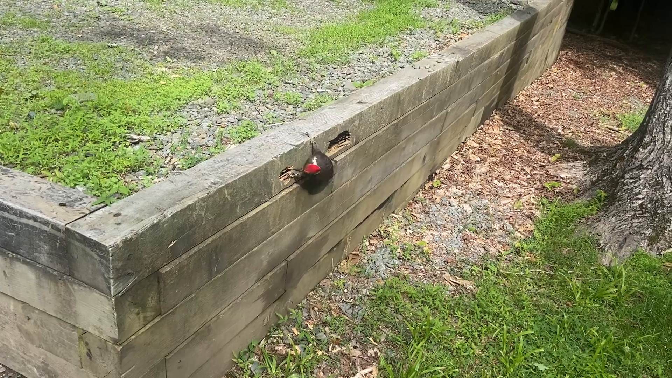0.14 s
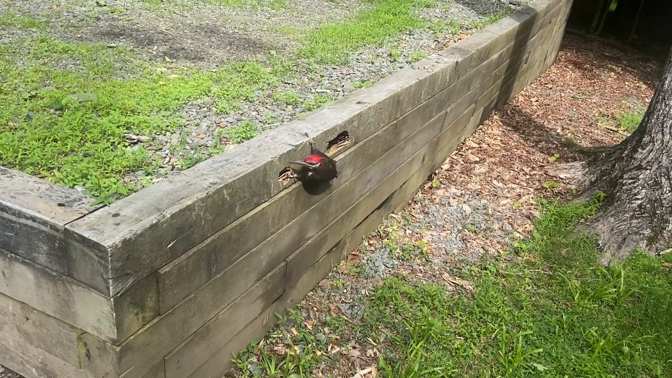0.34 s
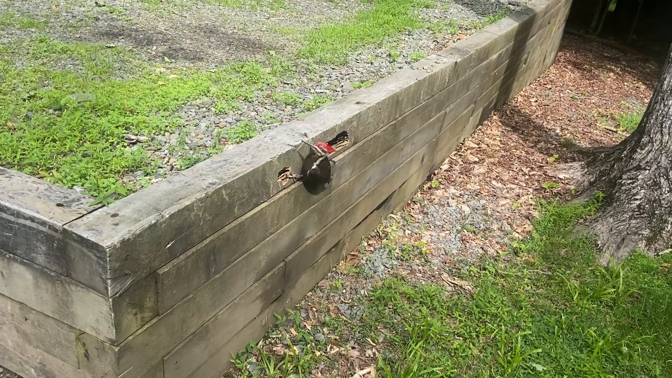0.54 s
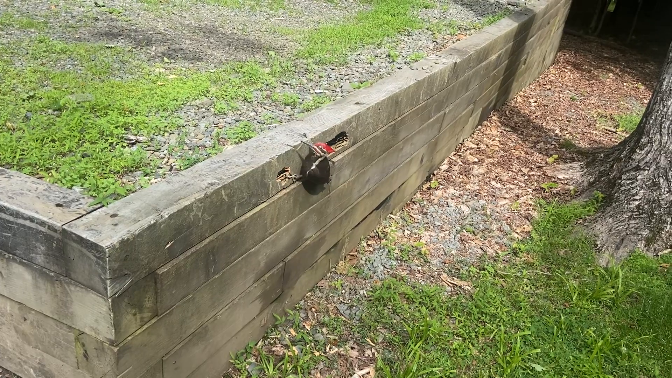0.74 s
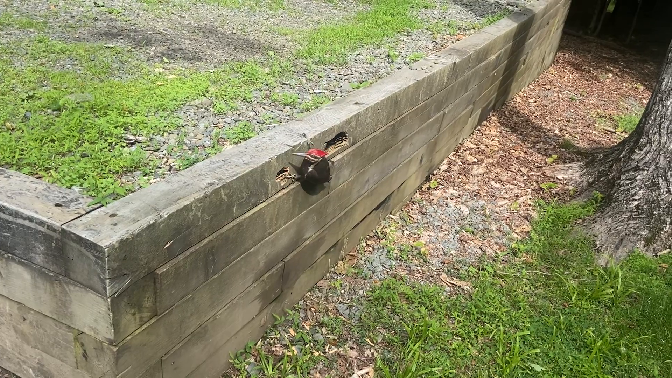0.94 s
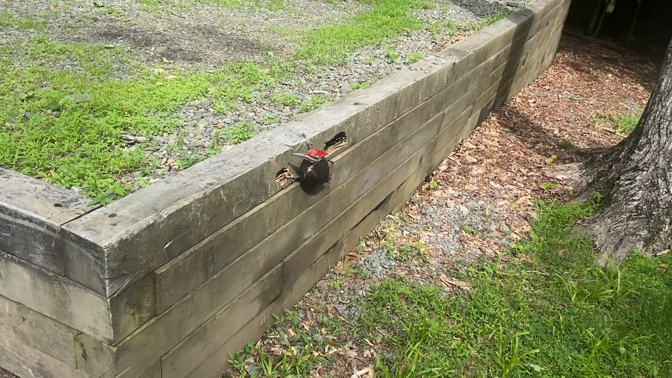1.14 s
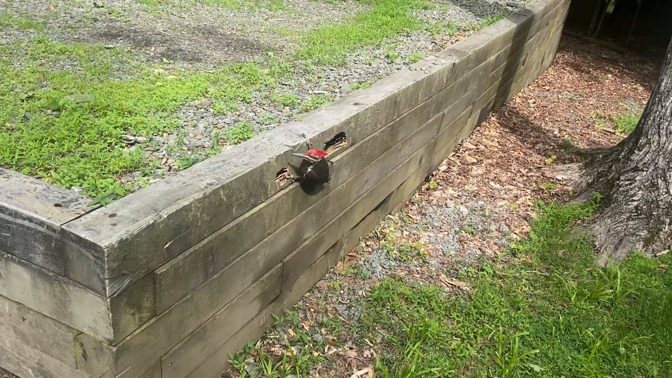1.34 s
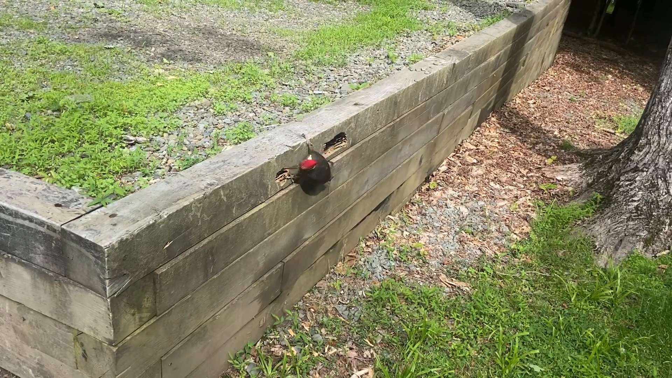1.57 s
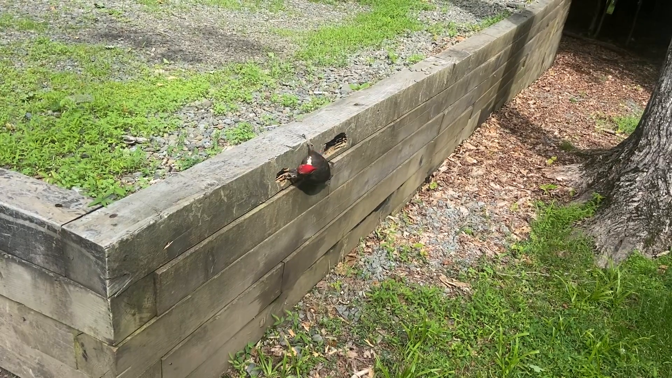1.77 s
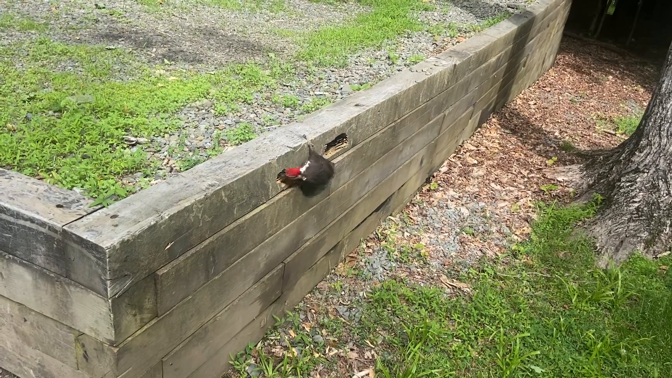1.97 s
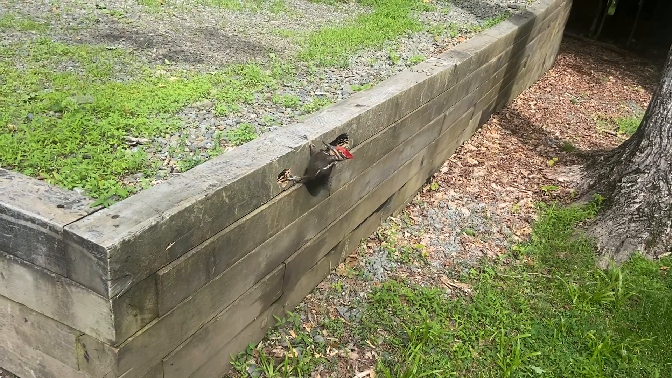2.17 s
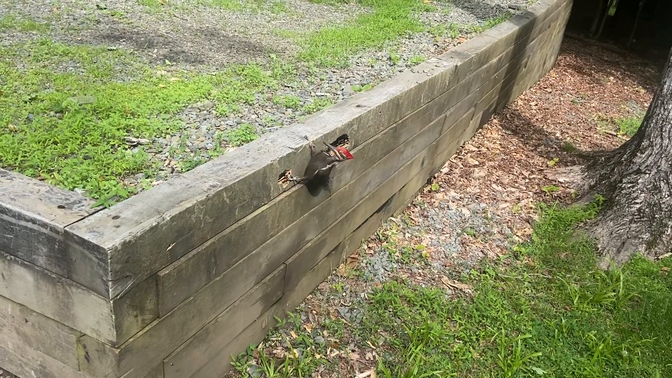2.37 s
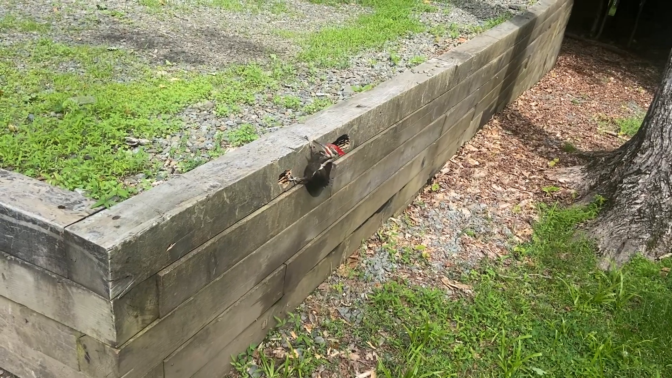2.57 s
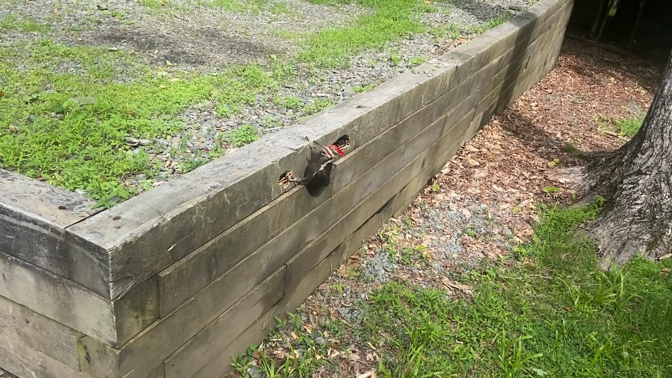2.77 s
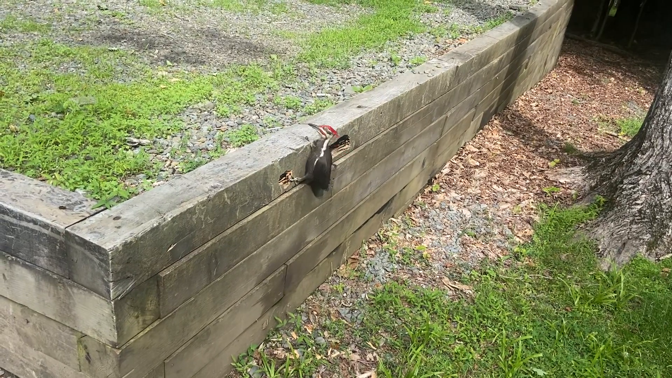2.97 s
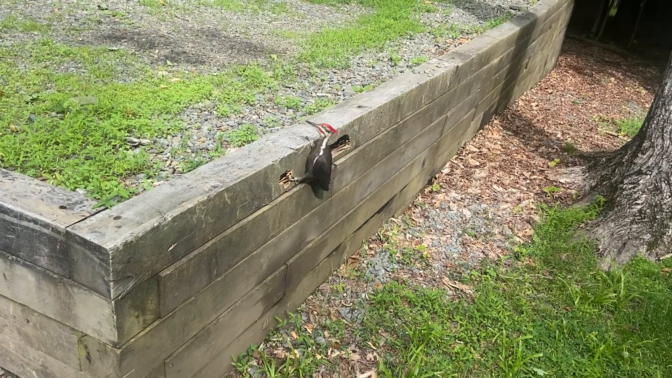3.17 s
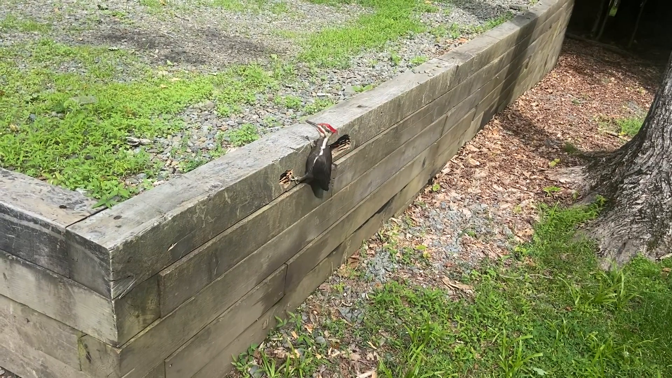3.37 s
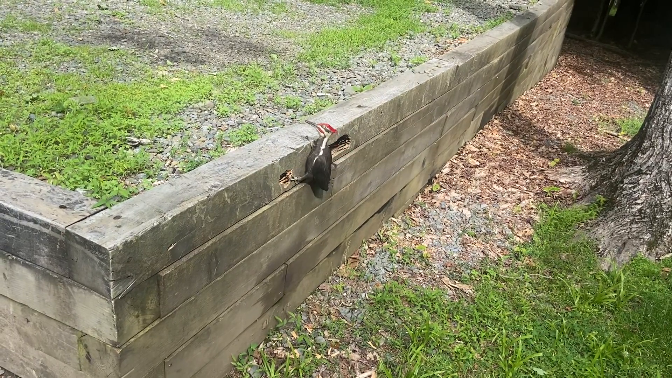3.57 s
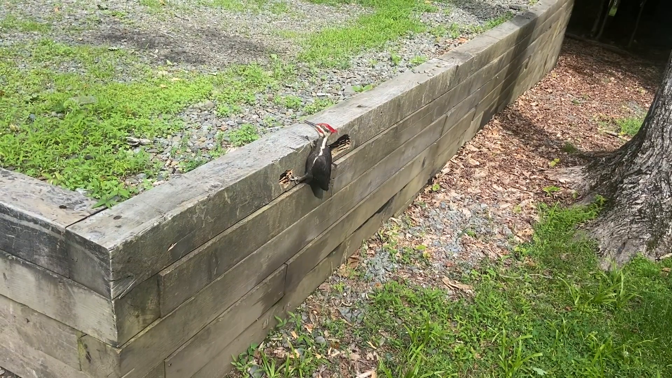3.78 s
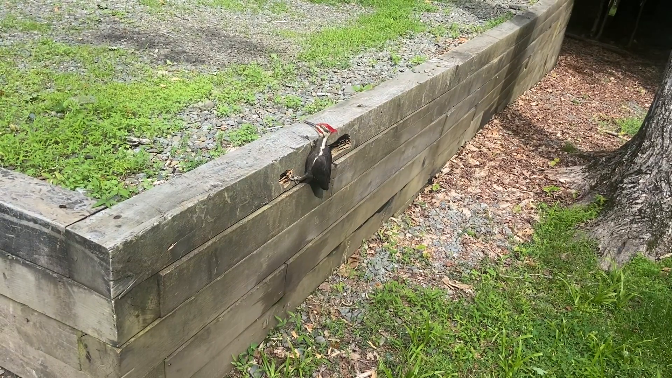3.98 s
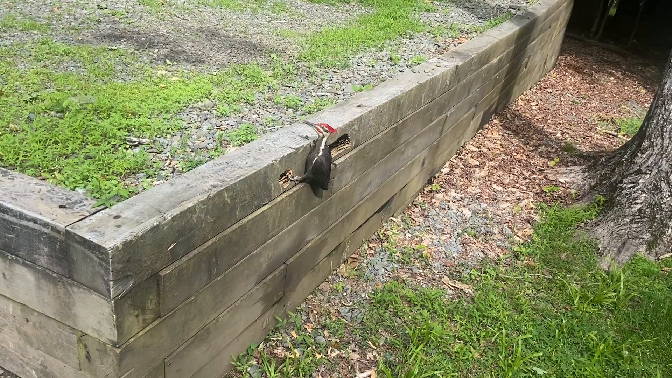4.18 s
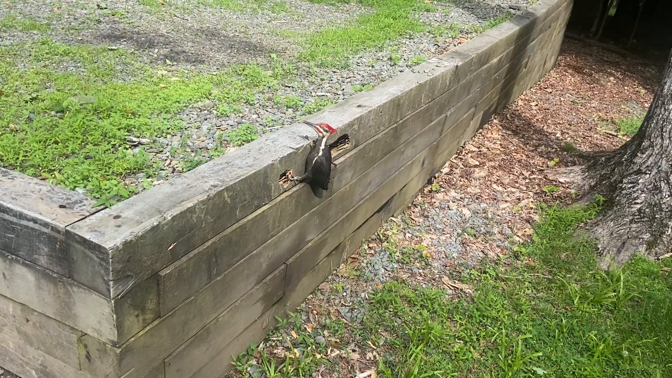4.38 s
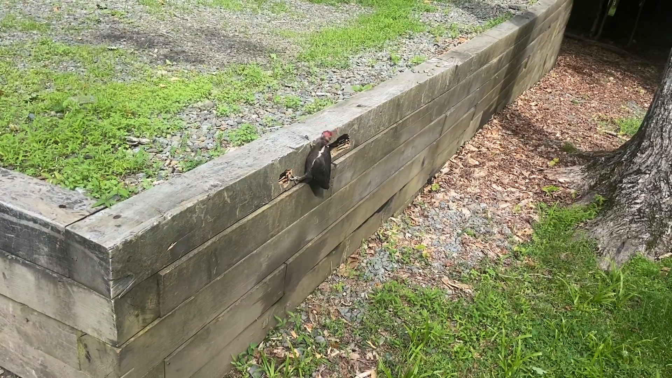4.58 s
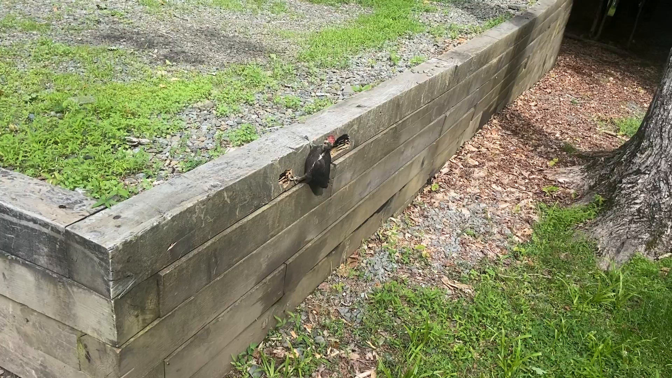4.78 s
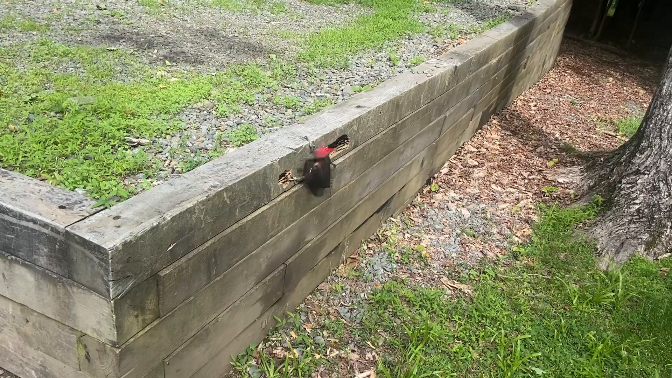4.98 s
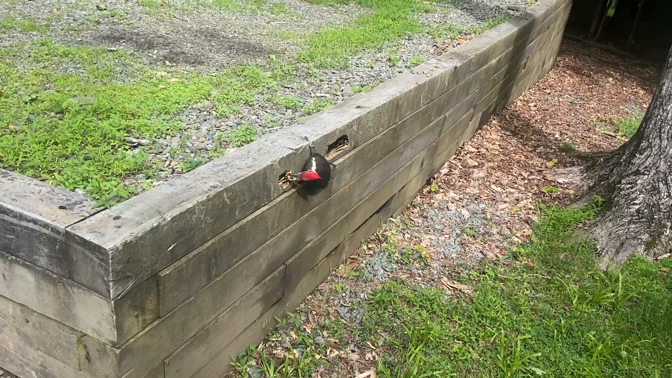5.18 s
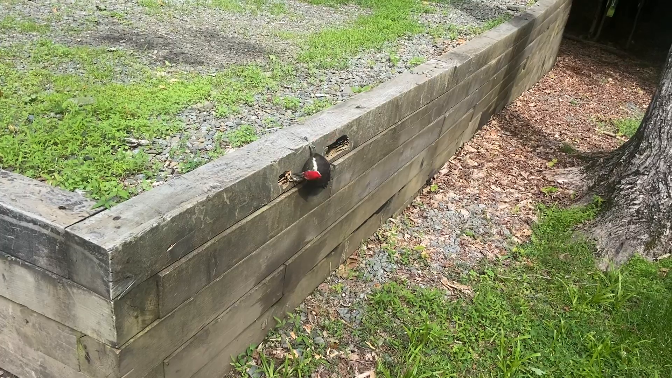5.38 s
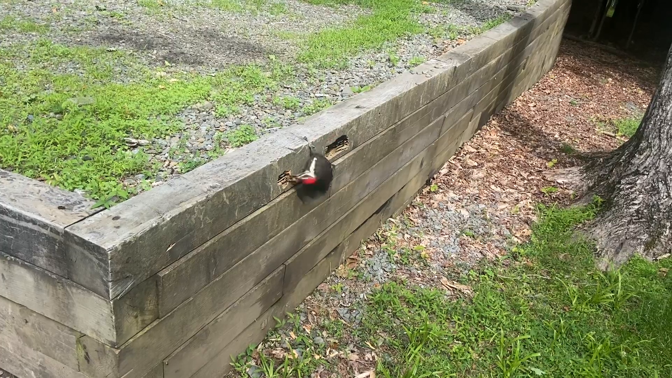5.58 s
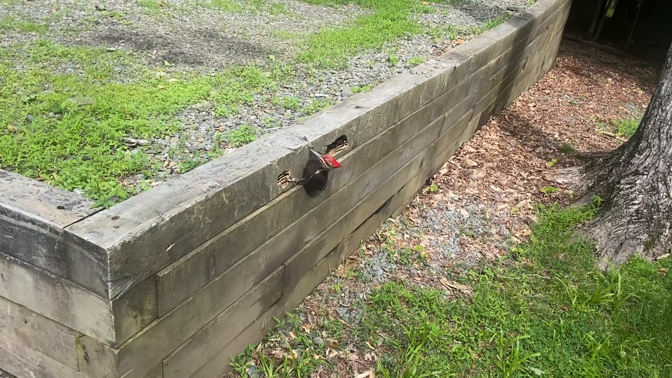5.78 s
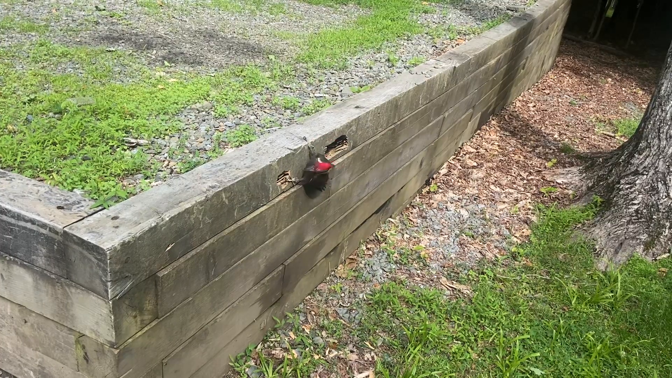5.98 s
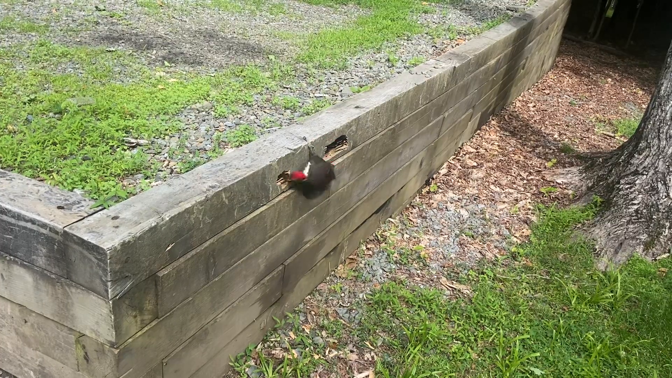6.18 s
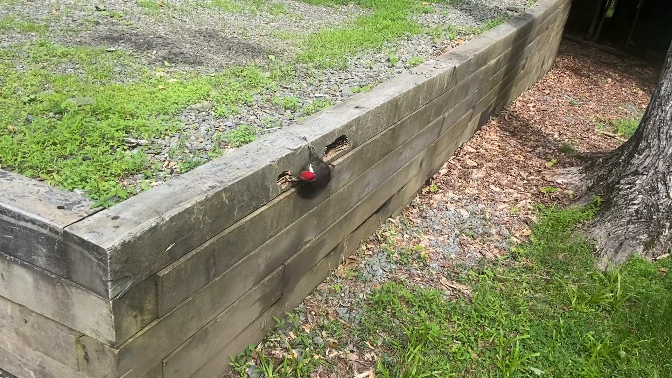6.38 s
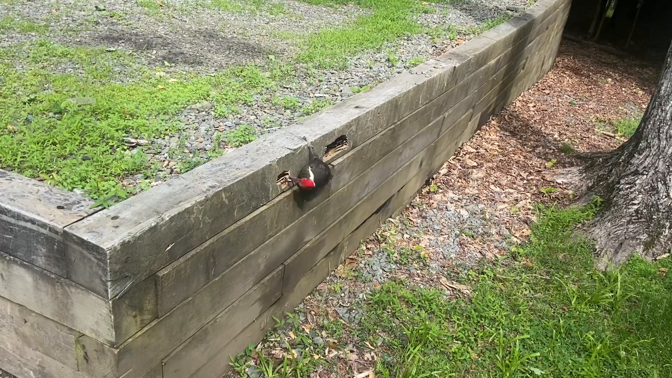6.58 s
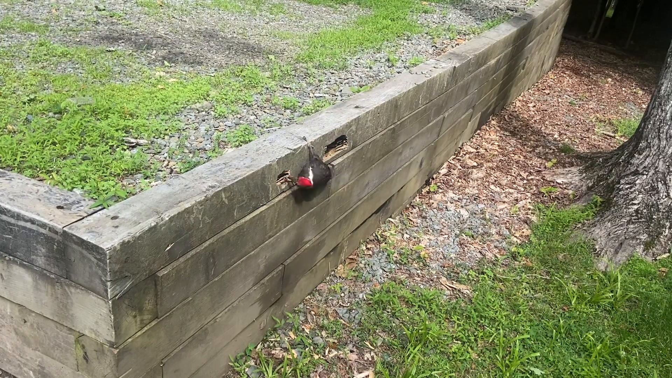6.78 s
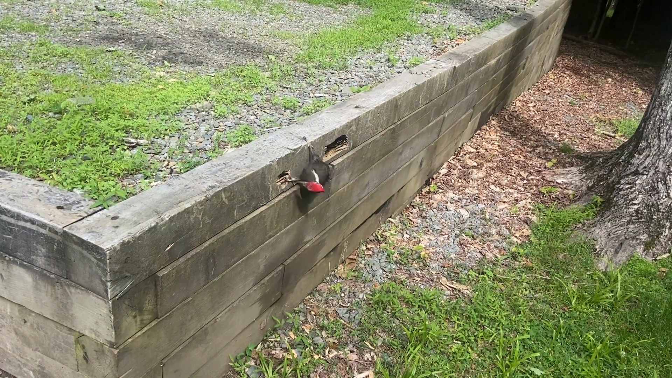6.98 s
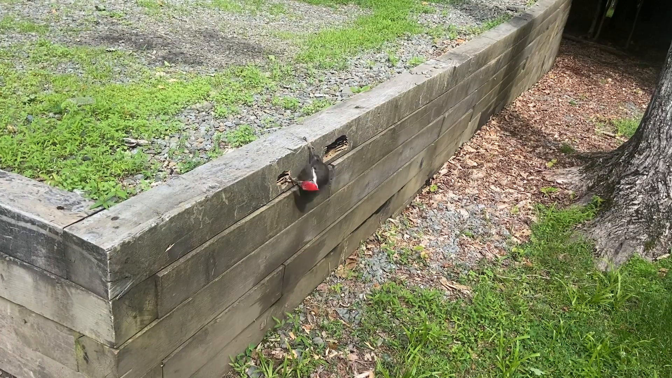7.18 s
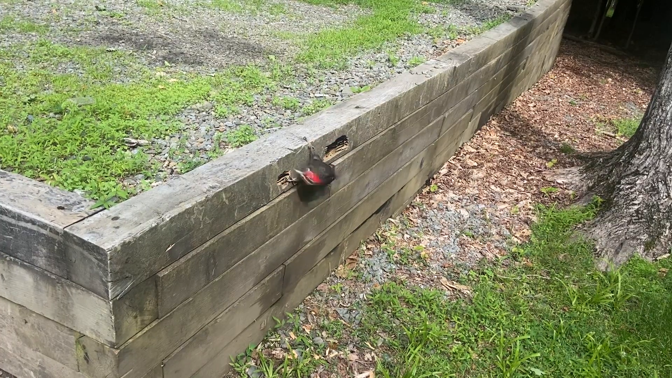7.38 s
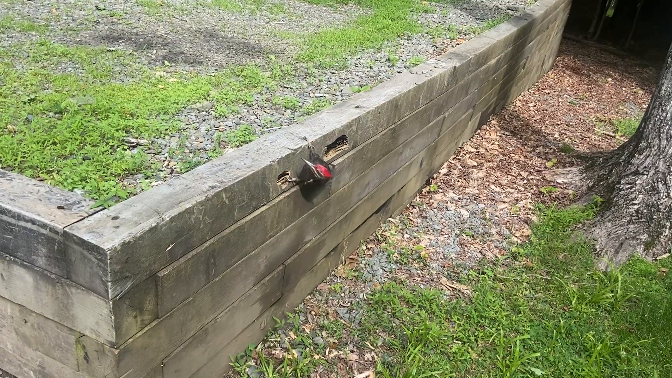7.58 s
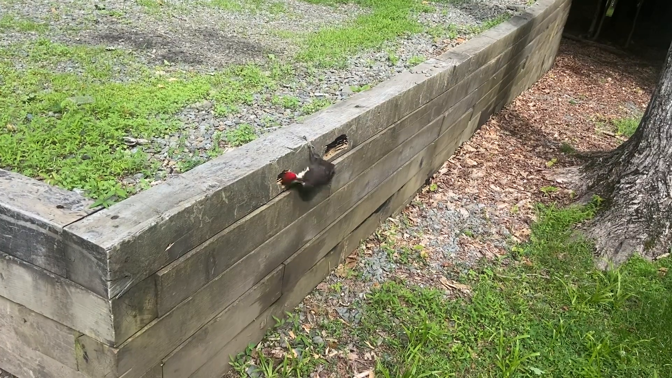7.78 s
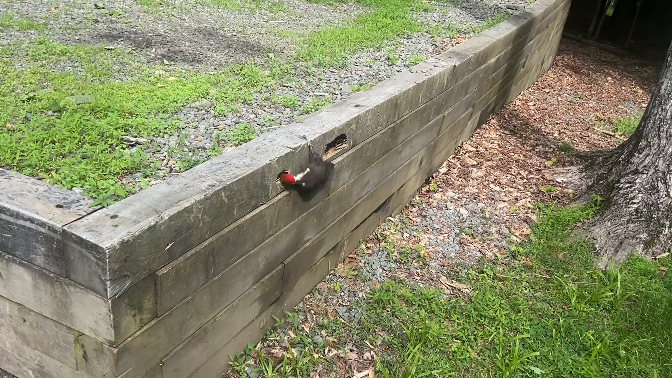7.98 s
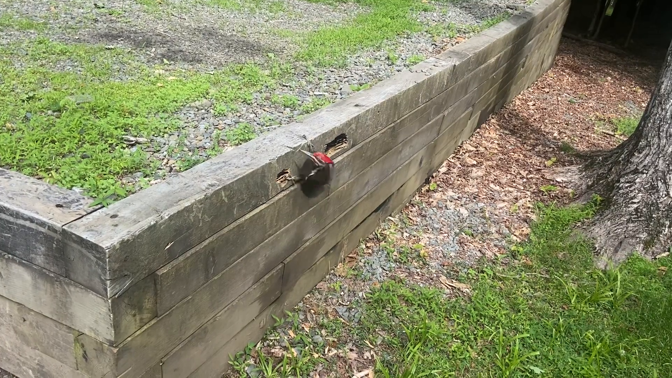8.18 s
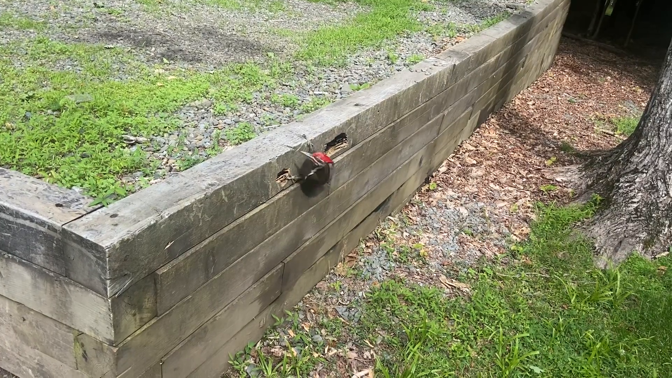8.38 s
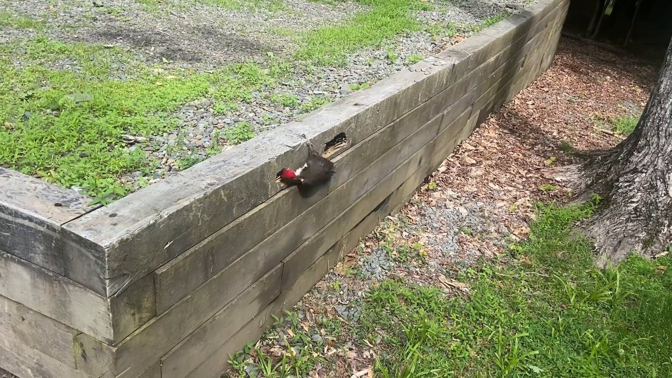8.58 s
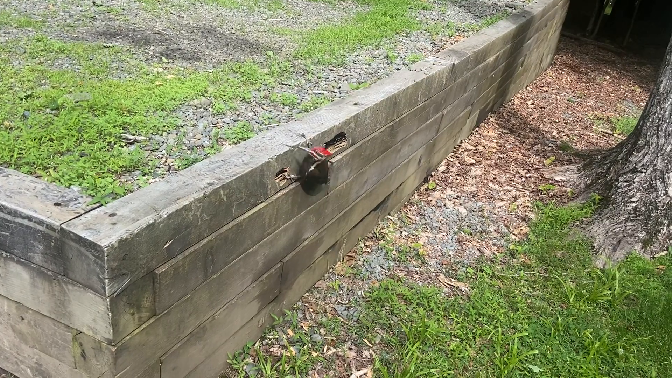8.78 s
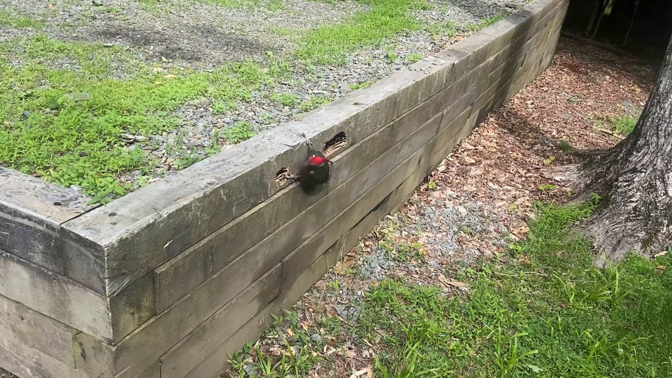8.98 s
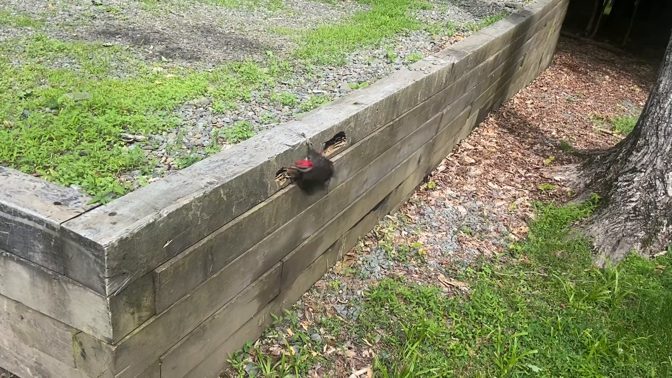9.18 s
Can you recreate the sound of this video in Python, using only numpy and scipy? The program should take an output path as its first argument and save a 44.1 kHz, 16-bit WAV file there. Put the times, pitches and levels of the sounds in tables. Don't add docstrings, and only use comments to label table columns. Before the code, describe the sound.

A woodpecker chisels a thick timber wall with sparse, irregular dry knocks while songbirds whistle among trees over a low distant traffic rumble.

```python
import sys
import numpy as np
from scipy import signal
from scipy.fft import rfft, irfft
from scipy.io import wavfile
from scipy.ndimage import uniform_filter1d

SR = 44100
rng = np.random.default_rng(int(sys.argv[2]) if len(sys.argv) > 2 else 0)


def generate_wav(signal):
    frames = np.transpose(np.atleast_2d(signal))
    scaled = np.clip(frames, -1, 1) * 32767
    pcm = np.round(scaled).astype(np.int16)
    wavfile.write(sys.argv[1], SR, pcm)


def invert_db(level):
    return 10 ** (np.asarray(level, dtype=float) / 20)


N = 407484

# t/s, peak level/dB, thud level/dB, knock level/dB (both re peak), crush time/ms
BLOWS = [(0.2478, -32, -13, 0, 4.7), (2.0225, -36, -19, -6, 4.5), (2.0633, -31.5, -15.5, -13, 9.5),
         (5.5185, -48, -14, 10.5, 3.5), (5.584, -32.5, -9.5, -9.5, 6.2), (6.118, -38.5, -15, -3, 2.4),
         (6.4157, -34.5, -23, -2.5, 2.7), (6.4271, -39, -21.5, 0.5, 3.7), (6.632, -26.5, -13, -4.5, 5),
         (6.8544, -34.5, -1.5, -2.5, 4.4), (7.045, -30.5, -8, -6.5, 3.3), (7.2748, -28.5, -4, -7.5, 5.1),
         (7.7625, -39.5, -0.5, 3, 5.5), (7.9755, -34, -7, 1, 7), (8.5629, -37.5, -28, -2.5, 2.9),
         (9.1113, -37, -14.5, -4, 4.7)]
# t/s, peak level/dB, knock level/dB (re peak)
BILL_TOUCHES = [(0.2564, -43.5, -1), (0.3301, -56, 2), (0.4522, -71.5, -18), (1.9894, -52.5, 4.5),
                (2.031, -49, -7.5), (2.041, -40, -7.5), (2.049, -48, -5), (5.5391, -50.5, 3),
                (6.1345, -54, 7), (6.1873, -57, -3.5), (6.641, -46, -5.5), (6.864, -39, -3),
                (7.052, -36, -3), (7.074, -49, -4), (7.31, -53, -9.5), (7.8293, -65.5, 0),
                (8.579, -52.5, 4), (8.603, -55, -20), (5.526, -53, -4), (8.6447, -60, 6.5),
                (9.1387, -52, -4), (9.1815, -56.5, 3)]
# f/Hz, level/dB, t60/s, left minus right/dB, left lead/rad
THUD_MODES = [(305, -6, 0.025, 0, .15), (368, -4.5, 0.14, -4.5, 0.015), (420, -4, 0.024, -0.9, .3),
              (470, -4.5, 0.081, 2.5, 0.27), (555, -14.5, 0.044, -8, 0.95)]
KNOCK_MODES = [(850, -14.5, .025, -0.5, 0.9), (987, 3, 0.088, -2, 0.54), (1325, -3, .022, -3, 2),
               (1396, -0.5, .02, -3, 1.6), (1725, 7, 0.037, -3.5, 1.7), (1954, -8, 0.031, -2, 1.3)]
RING_MODES = [(2702, -3.5, 0.06, 9.5, 1.6), (3043, 1, 0.025, 4, 0.7), (3400, 4.5, 0.011, -2.5, 0.06),
              (3900, -3, 0.019, -1.5, 3), (4340, 0, 0.027, -4.5, 0.7), (4700, -5.5, 0.0053, 1, -1.5),
              (5120, -5.5, 0.01, 0, 0), (5450, -13.5, 0.0075, 7, 2), (6080, -0.5, 0.0071, -7, -0.15)]
# f/Hz, level/dB
SPLINTER_SPECTRUM = [(1200, -31), (3000, -17.5), (6000, 7.5), (7500, 5), (9500, 2.5), (12000, -4),
                     (15300, -12.5), (16200, -35.5)]
# t/s, click level/dB, pocket f/Hz, pocket ring level/dB
CHIPS = [(2.0621, -6, 2700, -19), (.2474, -19, 3330, -17.5), (5.5845, -18.5, 2994, -33),
         (2.0222, -28, 4500, -31), (7.977, -25.5, 2900, -38), (9.111, -40.5, 3400, -27.5),
         (.2468, -34.5, 7200, -26), (6.119, -36.5, 2720, -34.5), (6.632, -30, 4000, -29.5),
         (7.276, -29.5, 3500, -35)]

# t/s, f/Hz, level/dB
FIRST_PHRASE = [
    [(.82, 3900, -73.5), (.835, 3130, -74), (.848, 4200, -61), (.856, 4000, -59.5), (.872, 2750, -63),
     (.89, 2680, -62.5), (.912, 3450, -56.5), (.93, 4450, -64), (.955, 4577, -70.5)],
    [(.968, 3810, -67), (.985, 3070, -57), (1.0, 2550, -66.5), (1.038, 2100, -73), (1.05, 3750, -61),
     (1.075, 4080, -54), (1.088, 2987, -55.5), (1.105, 3310, -53.5), (1.12, 3700, -63)],
]
SECOND_PHRASE = [
    [(2.445, 3750, -60.5), (2.465, 2750, -60), (2.49, 2240, -69), (2.535, 2140, -69), (2.553, 3054, -53.5),
     (2.57, 3027, -57.5), (2.585, 4360, -55.5), (2.605, 3160, -54), (2.63, 2640, -63)],
]
THIRD_PHRASE = [
    [(4.735, 4350, -71.5), (4.745, 4180, -65), (4.765, 2950, -63.5), (4.78, 4130, -63), (4.8, 4450, -64)],
    [(4.81, 4046, -67), (4.83, 3400, -56), (4.853, 2620, -57.5), (4.877, 3310, -54.5), (4.9, 2247, -66.5),
     (4.915, 2490, -70), (4.935, 3296, -54), (4.967, 3917, -55), (4.98, 3920, -64)],
]
FOURTH_PHRASE = [
    [(6.46, 3900, -69), (6.488, 4300, -63.5), (6.497, 4300, -80), (6.51, 4250, -60.5), (6.55, 3350, -58),
     (6.565, 3300, -76.5)],
    [(6.69, 3700, -67), (6.705, 3100, -54), (6.725, 2250, -69), (6.74, 2700, -58), (6.762, 4000, -61),
     (6.772, 3250, -57), (6.805, 2500, -64)],
]
# t/s, f/Hz, level/dB
ARCHES = [
    [(.07, 2880, -77), (.13, 3740, -73.5), (.19, 4460, -72)],
    [(1.13, 5000, -82.5), (1.22, 5200, -87.5), (1.3, 5100, -74), (1.35, 4400, -72.5), (1.39, 3570, -73),
     (1.44, 2670, -70), (1.49, 3200, -75)],
    [(2.24, 4010, -75), (2.27, 4910, -61.5), (2.3, 5260, -60), (2.35, 5250, -68), (2.375, 4700, -59.5),
     (2.41, 5220, -60), (2.435, 5100, -65), (2.47, 4200, -64)],
    [(5.73, 4200, -77), (5.79, 4900, -71.5), (5.86, 4600, -74.5), (5.92, 4210, -80.5)],
    [(7.33, 2970, -69), (7.41, 4390, -76.5), (7.47, 3300, -70), (7.53, 2410, -77)],
]
# t/s, length/ms, start f/Hz, end f/Hz, level/dB
FAR_WHISTLES = [(.15, 29, 3380, 3160, -74), (.55, 65, 3400, 3230, -84), (2.35, 50, 4500, 3690, -68.5),
                (3.17, 78, 2200, 2227, -78.5), (3.315, 26, 6750, 7000, -63), (3.345, 48, 7000, 8500, -81),
                (3.9, 115, 5375, 5630, -76), (4.04, 90, 5500, 6600, -75.5), (4.179, 42, 3640, 2980, -69),
                (4.26, 73, 2987, 2152, -69.5), (4.331, 27, 2810, 2930, -67), (4.385, 76, 3095, 2830, -72),
                (4.722, 60, 5480, 4500, -69.5), (4.75, 890, 1436, 1428, -79.5),
                (6.605, 51, 4700, 5600, -56.5), (8.191, 43, 1796, 1780, -72), (8.44, 55, 2355, 2296, -77.5),
                (8.88, 34, 3370, 3530, -75.5), (8.905, 50, 2785, 4210, -68), (9.02, 36, 3700, 4070, -66.5),
                (9.055, 56, 2700, 3230, -65)]

# f/Hz, level/dB per Hz
GARDEN_SPECTRUM = [(13, -47.5), (22, -30.5), (43, -7.5), (64, -0.5), (115, -5.5), (170, -13.5), (213, -17),
                   (250, -18.5), (335, -20.5), (777, -29.5), (1250, -39), (2260, -43), (5000, -56),
                   (6500, -85), (11000, -120)]
# f/Hz, side minus mid level/dB
GARDEN_SIDE = [(60, -18), (110, -18), (200, -10), (380, -7), (700, -2.5), (1290, 2.5), (2380, -5),
               (4400, -6.5), (8120, 6), (15000, -1)]
# f/Hz, level/dB per Hz
HISS_SPECTRUM = [(2500, -55.5), (5000, -61.5), (7000, -55), (10000, -60), (13000, -63), (13800, -79.5)]
# f/Hz, width/Hz, level/dB
HUM = (60, 7.5, -7)
# t/s, level/dB
TRAFFIC = [(0.0, -63.5), (0.62, -62.5), (1.13, -64.5), (2.42, -62.5), (2.83, -67.5), (3.14, -61),
           (4.4, -61), (4.73, -56.5), (4.99, -60), (6.59, -58), (6.82, -60), (7.2, -61), (8.62, -64),
           (9.24, -62.5)]

TOUCH_CRUSH_MS, TOUCH_THUD_DB = 3.5, -5.5
SPLINTER_DB, SPLINTER_DB_PER_MS = -5.5, 0.9
FAINT_DB, FAINT_DULL = -50.5, 0.4
RISE_SHARE, THUD_LATE_MS = 0.28, 3.5
GROUND_DIP_HZ, GROUND_DIP_Q, LEAF_TOP_HZ = 670.0, 3.6, 11000.0
SLUR_MS, EDGE_MS = 7.0, 4.0
GARDEN_DB = -53
WASH_SHARE, WASH_RISE_DB, WASH_PEAK_S, WASH_WIDTH_S = 0.2, 5.5, 6.9, 1.2
SPLIT_HZ, ALIGNED_HZ, TURN_HZ = 5700, 7000, 4050


def woodpecker():
    size, lead = 4096, 441
    out = np.zeros((3, N + 8192))
    ms = (np.arange(size) - lead) / SR * 1000
    after = np.maximum(ms, 0)
    splinter = invert_db(shape(np.fft.rfftfreq(size, 1 / SR), SPLINTER_SPECTRUM))
    touches = [(s, db, knock_db + TOUCH_THUD_DB, knock_db, TOUCH_CRUSH_MS)
               for s, db, knock_db in BILL_TOUCHES]

    for s, peak_db, thud_db, knock_db, crush_ms in list(BLOWS) + touches:
        bite_ms = np.clip(2.5 * (crush_ms - 2.4), 1.5, 7)
        bite = invert_db(-8.5) * (ms < 0) * np.clip(1 + ms / bite_ms, 0, 1) ** 0.4
        rise = np.minimum(ms, 0) / (RISE_SHARE * crush_ms)
        crush = np.exp(-(after / crush_ms) ** 2 - rise ** 2)
        crumbs = (ms >= 0) * np.exp(-after / 10.0)
        snaps = rng.standard_normal(size) * invert_db(2.5 * rng.exponential(size=size))
        push = snaps * (bite + crush + invert_db(-9.5) * crumbs)

        surface = snaps * (bite + crush + invert_db(-19.0) * crumbs)
        splinter_db = min(SPLINTER_DB + SPLINTER_DB_PER_MS * crush_ms, 1)
        splinter_db -= FAINT_DULL * max(FAINT_DB - peak_db, 0)
        crack = invert_db(splinter_db) * peak_one(irfft(rfft(surface) * splinter, size)[None])

        late_push = np.roll(push, int(THUD_LATE_MS * SR / 1000))
        beam = ring(push, RING_MODES, 2.0, 0.008)
        beam = beam + invert_db(knock_db) * ring(push, KNOCK_MODES, 2.5, 0.033)
        beam = beam + invert_db(thud_db) * ring(late_push, THUD_MODES, 3.0, 0.036)

        at = int(s * SR) - lead
        out[:2, at:at + size] += invert_db(peak_db) * (beam + crack)
        out[2, at:at + size] += invert_db(peak_db) * (invert_db(-6.5) * beam[0] + crack[0])

    out = signal.sosfilt(signal.butter(2, 200.0, "high", fs=SR, output="sos"), out)
    out = signal.lfilter(*signal.iirnotch(GROUND_DIP_HZ, GROUND_DIP_Q, SR), out)
    to_trees = signal.sosfilt(signal.butter(2, LEAF_TOP_HZ, fs=SR, output="sos"), out[2])[:N]
    near = invert_db(-14) * trees(to_trees, 0.075, 0.0074, 0.86, 4100.0, 0.27)
    far = invert_db(-23.5) * trees(to_trees, 0.89, 0.04, 0.33, 4500.0, 0.54)
    return out[:2, :N] + near + far


def ring(push, modes, scatter_db, detune):
    hz, db, t60, pan_db, lead = np.transpose(modes)[:, :, None]
    t60 = np.minimum(t60, 0.012 + 14 / hz)
    chance = rng.standard_normal((2, len(modes), 1))
    hz = hz * (1 + detune * chance[1])
    spectrum = np.sqrt(uniform_filter1d(abs(rfft(push)) ** 2, size=11))
    fed = spectrum[(hz * len(push) / SR).astype(int)]
    t = np.arange(len(push)) / SR
    fade = invert_db(db + scatter_db * chance[0] - 60 * t / t60) / fed
    pair = []
    for side in (0.5, -0.5):
        wave = np.sin(2 * np.pi * hz * t + side * lead)
        pair.append(np.sum(fade * invert_db(side * pan_db) * wave, axis=0))
    return peak_one(signal.fftconvolve(push[None], np.array(pair))[:, :len(push)])


def peak_one(x):
    return x / np.sqrt(uniform_filter1d(np.mean(x, axis=0) ** 2, size=176).max())


def chips():
    out, t = np.zeros(N), np.arange(800) / SR
    for s, db, hz, ring_db in CHIPS:
        click = invert_db(-9.5) * rng.standard_normal(len(t)) * np.exp(-t / 0.00047)
        click[:3] += -0.6, 1.0, -0.7
        envelope = np.exp(-t / 0.0028) * (1 - np.exp(-t / 0.0004))
        pocket = np.sin(2 * np.pi * hz * t) * envelope
        at = int(s * SR)
        out[at:at + len(t)] += invert_db(db) * click + invert_db(ring_db) * pocket
    direct = out * invert_db(np.array([[1.5], [-1.5]]))
    return direct + invert_db(-19) * trees(out, 0.11, 0.004, 0.7, 9000.0, 0.6)


def songbirds():
    phrases = list(FIRST_PHRASE) + list(SECOND_PHRASE) + list(THIRD_PHRASE) + list(FOURTH_PHRASE)
    glides = [[(s, start_hz, db), (s + ms / 1000, end_hz, db)]
              for s, ms, start_hz, end_hz, db in FAR_WHISTLES]
    near = song(phrases, SLUR_MS, EDGE_MS, 16.0)
    scattered = song(phrases, SLUR_MS, EDGE_MS, 220.0)
    far = song(list(ARCHES) + glides, 20.0, 12.0, 150.0)

    twinkle_db = 3.3 * walk(90)
    direct = near * invert_db(np.array([[-1.0], [-2.0]]) + twinkle_db) + far * invert_db(-14)
    echo = invert_db(1.5) * trees(near, 0.33, 0.0041, 0.5, 5000.0, 0.8)
    echo = echo + invert_db(-4) * trees(scattered, 1.4, 0.065, 0.498, 5700.0, 0.48)
    echo = echo + invert_db(-1.5) * trees(far, 1.0, 0.0048, 0.49, 5200.0, 0.33)
    return direct + echo


def song(syllables, slur_ms, edge_ms, waver_hz):
    out, waver = np.zeros(N), waver_hz * walk(350)
    for points in syllables:
        s, hz, db = np.transpose(points)
        at = np.arange(int(s[0] * SR), int(s[-1] * SR))
        t = at / SR
        glide = np.interp(t, s, hz)
        hz = uniform_filter1d(glide, int(slur_ms * SR / 1000) + 1, mode="nearest") + waver[at]
        edge = np.clip(np.minimum(t - t[0], t[-1] - t) / edge_ms * 1000, 0, 1)
        level = invert_db(np.interp(t, s, db) + 1.5) * np.sin(edge * np.pi / 2) ** 2
        out[at] += level * np.sin(2 * np.pi * np.cumsum(hz) / SR)
    return out


def trees(x, t60, onset_s, like, dull_hz, treble_share):
    t = np.arange(int(1.2 * SR)) / SR
    mid, side = rng.standard_normal((2, len(t))) * (1 - np.exp(-t / onset_s))
    mid, side = np.sqrt(1 + like) * mid, np.sqrt(1 - like) * side
    pair = np.array([mid + side, mid - side])
    low = signal.sosfilt(signal.butter(2, dull_hz, fs=SR, output="sos"), pair)
    high = pair - low
    pair = low * invert_db(-60 * t / t60) + high * invert_db(-60 * t / t60 / treble_share)
    return signal.fftconvolve(x[None], pair / np.sqrt(np.sum(pair ** 2) / 2))[:, :N]


def garden():
    hz = np.fft.rfftfreq(N, 1 / SR)
    mid, side = rfft(rng.standard_normal((2, N)))
    side = side * invert_db(shape(hz, GARDEN_SIDE))
    pair = np.array([mid + side, mid - side])
    hum_hz, hum_width_hz, hum_db = HUM
    colour = invert_db(shape(hz, GARDEN_SPECTRUM)) + invert_db(shape(hz, HISS_SPECTRUM)) * (hz > 2000)
    colour = colour + invert_db(hum_db) / (1 + (2 * (hz - hum_hz) / hum_width_hz) ** 2)

    t = np.arange(N) / SR
    s, drone_db = np.transpose(TRAFFIC)
    drone_db = np.interp(t, s, drone_db - np.mean(drone_db))
    passing = np.exp(-((t - WASH_PEAK_S) / WASH_WIDTH_S) ** 2)
    wash_db = WASH_SHARE * drone_db + WASH_RISE_DB * (passing - 0.3)

    out, swell = 0, walk(0.083)
    for k in range(21):
        centre = 20 * 2 ** (k / 2)
        overlap = np.clip(1 - 2 * abs(np.log2((hz + 1) / centre)), 0, 1)
        band = np.sqrt(overlap) * colour
        db = 0.38 * swell + 1.1 * walk(6)
        if k in (4, 5):
            db = db + drone_db
        elif 8 < k < 16:
            db = db + 0.41 * wash_db
        out = out + invert_db(db) * irfft(band * pair, N)
    return out * invert_db(GARDEN_DB) / np.std(out.mean(axis=0))


def walk(rate):
    k = int(SR / rate)
    held = np.repeat(rng.standard_normal(N // k + 1), k)
    return 1.3 * uniform_filter1d(uniform_filter1d(held, k), k)[:N]


def shape(hz, points):
    at, db = np.transpose(points)
    return np.interp(np.log(hz + 1), np.log(at), db)


def scene():
    return woodpecker() + chips() + songbirds() + garden()


def roll_off(x):
    return signal.sosfilt(signal.butter(12, 16850, fs=SR, output="sos"), x)


def record(dry):
    hz = np.fft.rfftfreq(N, 1 / SR)
    top = np.clip((hz - SPLIT_HZ) / 270.0 + 0.5, 0, 1)
    lag = np.exp(-1j * np.pi * (hz - ALIGNED_HZ) / TURN_HZ)
    both = rfft(dry)
    spread = both.mean(axis=0) * np.array([lag, 1 / lag])
    mix = irfft((1 - top) * both + top * spread, N)
    return roll_off(mix)


dry = scene()
out = record(dry)
generate_wav(out)
```